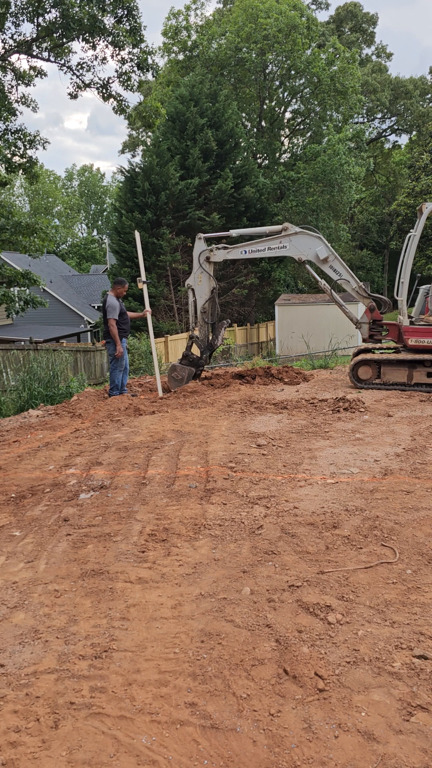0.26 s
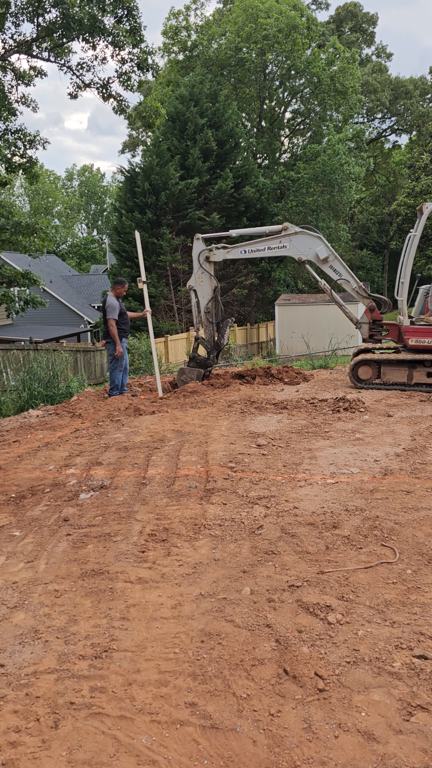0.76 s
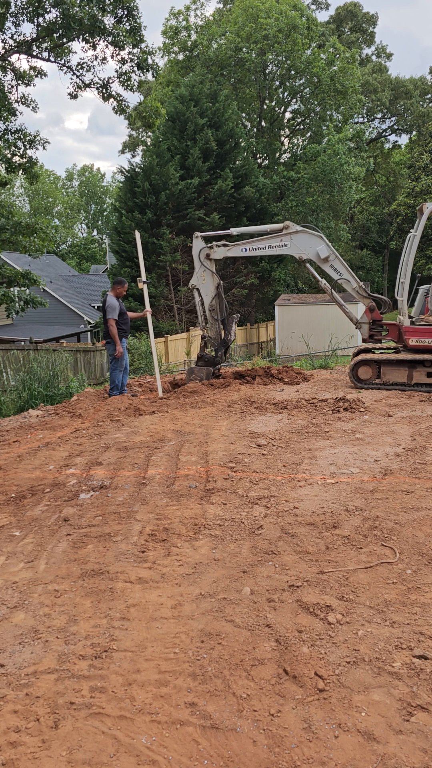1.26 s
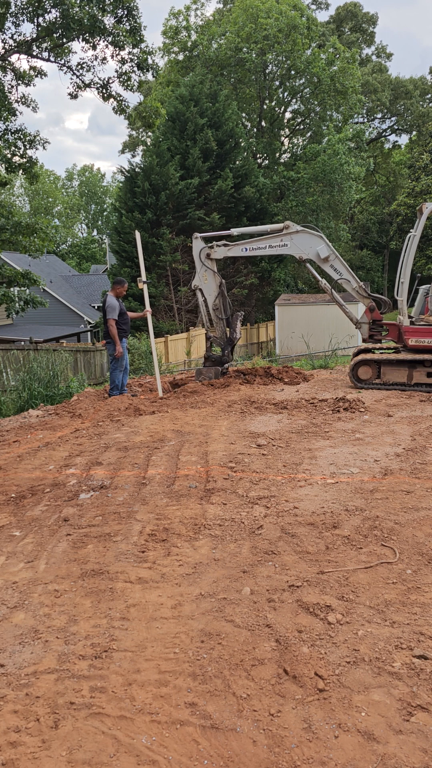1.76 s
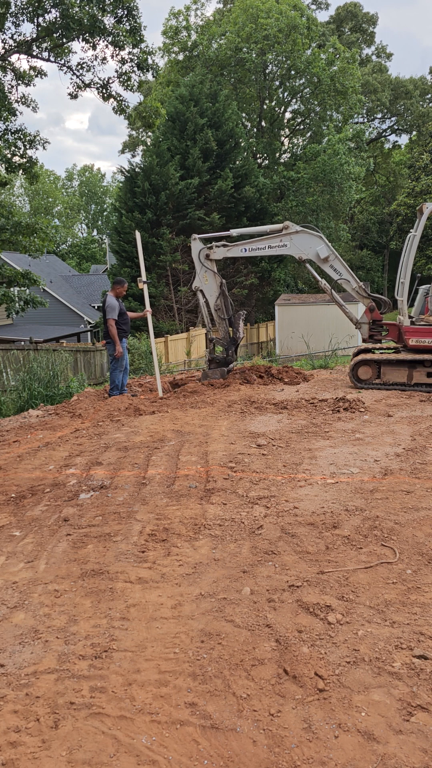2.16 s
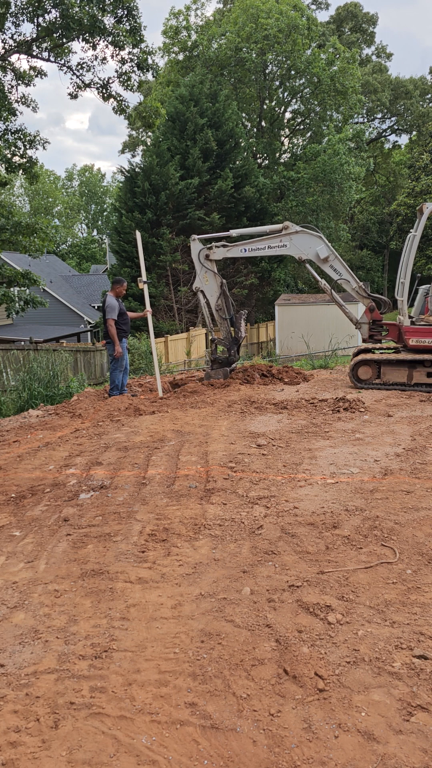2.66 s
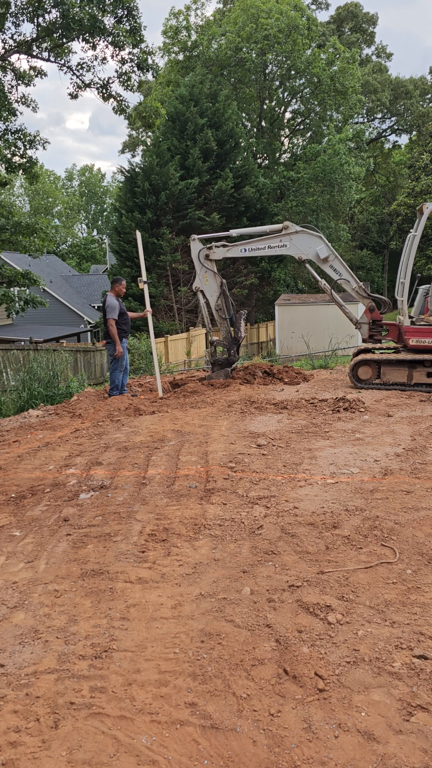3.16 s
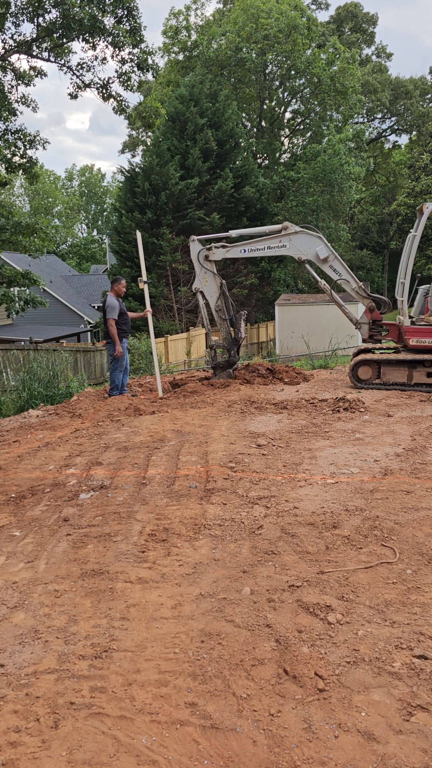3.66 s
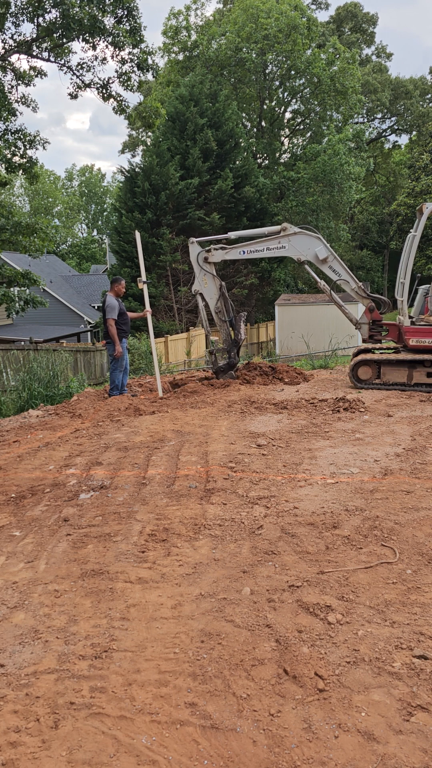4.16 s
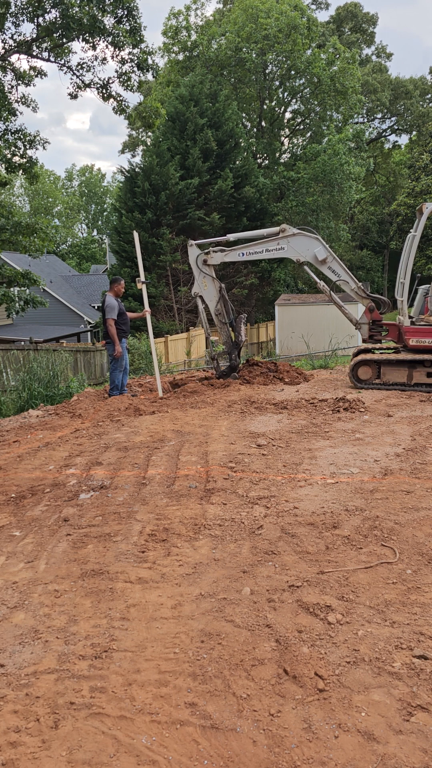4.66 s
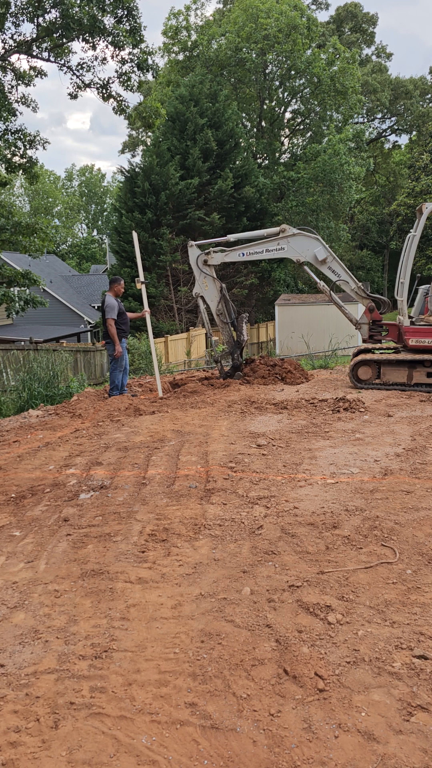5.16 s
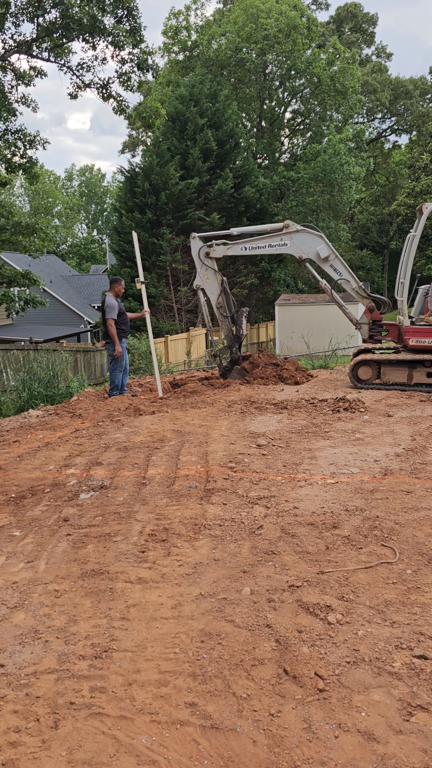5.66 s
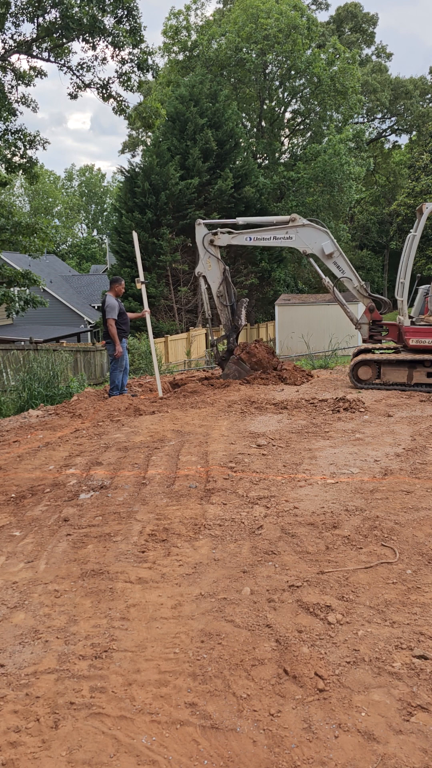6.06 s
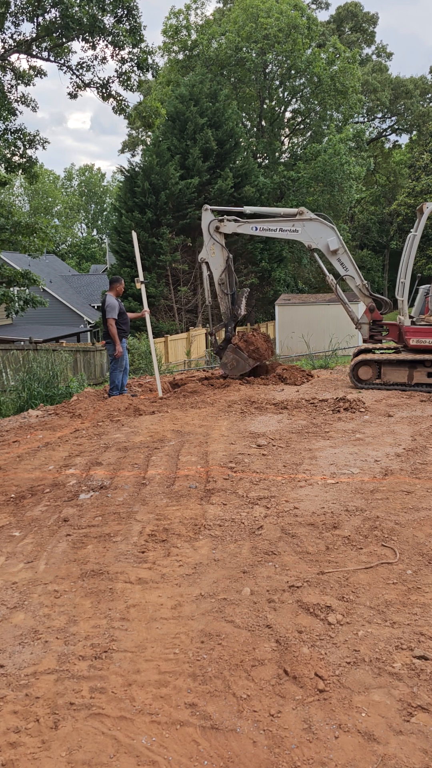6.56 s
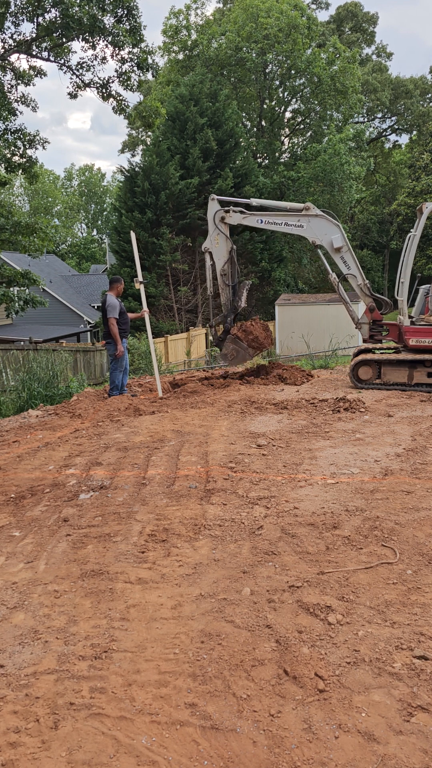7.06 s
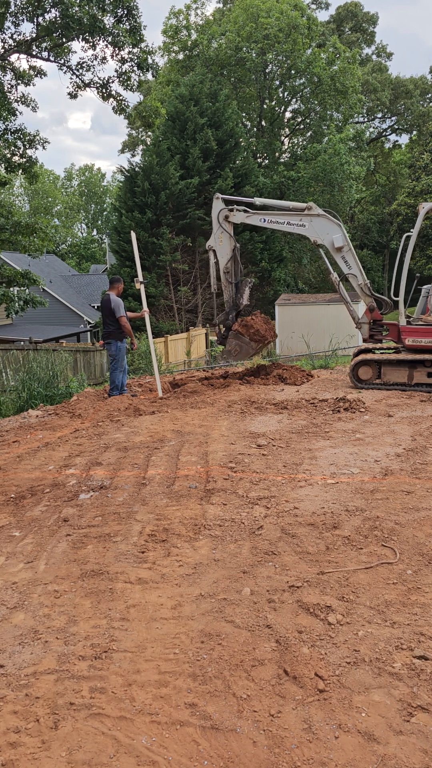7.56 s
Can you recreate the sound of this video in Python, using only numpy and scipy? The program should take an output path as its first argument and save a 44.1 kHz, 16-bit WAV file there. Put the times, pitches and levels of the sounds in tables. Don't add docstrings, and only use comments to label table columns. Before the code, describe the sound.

Outdoor clay yard, stereo microphone close to a big dog. A diesel digger booms steadily across the yard with valve clatter and hydraulic hiss. A faint far dog whine and dull clod thuds come early. The near dog barks hoarsely once a second, with short fence echoes. Near five seconds the engine speeds up slightly and loses its boom; a thin high bird whistle follows.

```python
import sys
import numpy as np
from scipy import signal
from scipy.fft import rfft, irfft, next_fast_len
from scipy.io import wavfile
from scipy.ndimage import uniform_filter1d, map_coordinates

SR = 44100
rng = np.random.default_rng(int(sys.argv[2]) if len(sys.argv) > 2 else 0)


def undo_db(level):
    steps = np.asarray(level, float) / 20
    return 10 ** steps


def to_wav(s):
    ch = np.atleast_2d(s).T
    pcm = np.round(np.clip(ch, -1, 1) * 32767)
    wavfile.write(sys.argv[1], SR, pcm.astype(np.int16))


N = 344862


def unit(x):
    return x / np.sqrt(np.mean(x ** 2) + 1e-20)


def seconds():
    return np.arange(N) / SR


def along(points, hz):
    f, v = np.transpose(points)
    return np.interp(np.log(hz + 1), np.log(f + 1), v)


def curves(rows):
    s, *columns = np.transpose(rows)
    return [np.interp(seconds(), s, column) for column in columns]


def wobble(rate):
    knots = rng.standard_normal(int(N * rate / SR) + 4)
    return map_coordinates(knots, [np.arange(N) * rate / SR])


def sine(hz):
    return np.sqrt(2) * np.sin(2 * np.pi * np.cumsum(hz) / SR)


def filtered(x, response):
    m = next_fast_len(N + SR // 2)
    return irfft(rfft(x, m) * response(np.fft.rfftfreq(m, 1 / SR)), m)[..., :N]


def resonated(x, modes, low_hz, high_hz):
    def ring(f):
        total = 0
        for k, (centre, width, db) in enumerate(modes):
            damping = 1j * f * width
            total = total + (-1) ** k * undo_db(db) * damping / (centre ** 2 - f ** 2 + damping)
        return total

    edges = signal.butter(4, [low_hz, min(high_hz, SR / 2.1)], "bandpass", fs=SR, output="sos")
    return unit(signal.sosfilt(edges, filtered(x, ring)))


def placed(pair, left_db, lead_s):
    half = np.array([[.5], [-.5]])
    return filtered(pair, lambda hz: undo_db(half * along(left_db, hz)) * np.exp(2j * np.pi * hz * lead_s * half))


# f/Hz, left-right likeness [0-1]
PORT_LIKENESS = [(60, 0.84), (300, 1), (700, 0.79), (1500, 0.87), (3000, 0.68), (7000, 0.36), (15000, 0.15)]


def rush(spectrum, white=None):
    white = rng.standard_normal((2, N)) if white is None else white

    def mid_side(hz):
        turn = np.arccos(np.clip(along(PORT_LIKENESS, hz), -1, 1)) / 2
        return undo_db(along(spectrum, hz)) * [np.cos(turn), np.sin(turn)]

    mid, side = filtered(white, mid_side)
    return unit(np.array([mid + side, mid - side]))


def tone(rows, drift_hz, rate):
    hz, db = curves(rows)
    on = (seconds() > rows[0][0]) & (seconds() < rows[-1][0])
    return on * undo_db(db) * sine(hz + drift_hz * wobble(rate))


# multiple of the four-stroke cycle, loaded level/dB, unloaded level/dB
EXHAUST_ORDERS = [(3.06, -36, -39.5), (4.05, -63, -48), (5.14, -47, -54), (7.26, -61, -53), (8, -69, -57),
                  (9.04, -32.5, -32.5), (10, -38.5, -62), (11.03, -49, -43), (12.015, -29.5, -35.5),
                  (12.66, -51, -47), (14.02, -79, -46), (15.31, -47, -55), (18.05, -67, -54.5),
                  (19.99, -46.5, -55), (21.04, -52.5, -82), (29.24, -61, -54.5), (32.5, -63, -95),
                  (34.6, -57, -70), (40.4, -58.5, -78), (39.8, -77, -60.5), (43.3, -59.5, -88),
                  (45.8, -68, -79), (42.6, -77, -79), (45, -69, -68), (50.5, -58.5, -73), (56, -80, -69),
                  (55.2, -66, -86), (57.9, -60, -82), (61.1, -59, -67)]


def exhaust(cycle, boom_db, load):
    out = undo_db(boom_db) * np.cos(2 * np.pi * 6 * cycle - 2.2)
    lag = 1.1 * (1 - load)
    for k, heavy_db, light_db in EXHAUST_ORDERS:
        level_db = light_db + load * (heavy_db - light_db) + 0.58 * wobble(10)
        scatter = .7 * k * k * (k % 3)
        out = out + undo_db(level_db) * np.cos(2 * np.pi * k * cycle - 2.2 + lag * (k > 6) + scatter)
    return np.sqrt(2) * out


# crank share [0-1], ring f/Hz, width f/Hz, loaded level/dB, unloaded level/dB
STRIKING_PARTS = [(.96, 1380, 160, -51.5, -56), (.34, 1400, 170, -53, -62), (.65, 1250, 140, -60, -60),
                  (.97, 2870, 260, -58, -59.5), (.05, 2620, 200, -60, -61), (.36, 2850, 260, -58.5, -64),
                  (.28, 2100, 150, -62, -55.5), (.34, 2150, 150, -56, -56.5), (.46, 1880, 140, -57, -57),
                  (.52, 2100, 140, -59, -56), (.63, 1930, 180, -56, -57), (.79, 2060, 140, -58, -59),
                  (.88, 1950, 140, -59, -59), (.0, 2050, 140, -59, -57), (.14, 1750, 120, -58, -62),
                  (.99, 1750, 120, -58, -64), (.04, 740, 70, -60, -56), (.7, 770, 70, -57, -62)]


def strikes(cycle, load):
    out = np.zeros(N)
    for share, hz, width_hz, heavy_db, light_db in STRIKING_PARTS:
        at = np.flatnonzero(np.diff(np.floor(cycle - share)))
        blows = np.zeros(N)
        blows[at] = undo_db(1.8 * rng.standard_normal(N)[at])
        rattle = signal.lfilter([1], [1, -np.exp(-1 / (.003 * SR))], blows) * rng.standard_normal(N)
        struck = unit(blows) + .4 * unit(rattle) + .35 * rng.standard_normal(N)
        mode = signal.tf2sos(*signal.iirpeak(hz, hz / width_hz / 1.3, SR))
        ring = signal.sosfilt(np.vstack([mode, mode]), struck)
        out += undo_db(light_db - 5 + load * (heavy_db - light_db)) * unit(ring)
    return out


# one row loaded, one unloaded; a column for each cylinder, level/dB
CYLINDER_KNOCK = [(0, 2, 2.1), (0, -2, 3.7)]


def knocks(cycle, load):
    firing = (3 * cycle).astype(int)
    heavy_db, light_db = np.array(CYLINDER_KNOCK)[:, firing % 3]
    chance_db = 1.2 * rng.standard_normal(firing[-1] + 1)[firing]
    since = 3 * cycle - firing
    size = undo_db(light_db + load * (heavy_db - light_db) + chance_db)
    return size * (1 - np.exp(-since / 0.064)) * np.exp(-since / 0.18)


# from t/s, hiss level/dB
PUMP_PRESSURE = [
    (0, -54),
    (.55, -58),
    (3.0, -55),
    (5.07, -59.5),
    (6.5, -58.5),
    (7.1, -60),
]


def pressure():
    s, db = np.transpose(PUMP_PRESSURE)
    step = np.searchsorted(s, seconds(), "right").clip(1) - 1
    return uniform_filter1d(db[step], size=2500)


# f/Hz, level/dB per Hz
RUMBLE_SPECTRUM = [(15, -60.5), (25, -13), (61, -16.5), (91, -11), (130, -8), (184, -3.5), (226, -10.5),
                   (344, -27.5), (700, -52), (910, -72), (1540, -120)]
CLATTER_LOADED = [(210, -52), (350, -5), (384, -6.5), (532, -2.5), (576, -5.5), (674, -9.5), (875, -10.5),
                  (947, -12.5), (1330, -6.5), (1600, -13), (1750, -11), (2310, -18), (2770, -12),
                  (3280, -17), (8000, -18), (10400, -28), (17600, -120)]
CLATTER_UNLOADED = [(210, -49), (350, -5.5), (420, -14.5), (461, -2), (656, -20), (710, -10), (831, -12),
                    (998, -22), (1180, -11.5), (1620, -16), (2100, -39), (2370, -21), (2840, -18.5),
                    (4050, -24.5), (8000, -25.5), (10400, -58), (17600, -120)]
PUMP_HISS = [(2940, -0.5), (5000, -9), (5660, -15), (6930, -23.5), (7520, -1), (8350, -7), (9200, 3.5),
             (9740, -0.5), (10400, -7.5), (13400, -6.5), (15700, -16)]
PUMP_GEARS = [(1500, -120), (1700, -2), (1850, -7.5), (2070, -2.5), (2230, -8), (2400, -120)]


def casing(cycle, load):
    knock = knocks(cycle, load)
    repeating = rng.standard_normal((2, 3000))[:, (cycle % 1 * 3000).astype(int)]
    parts = .85 * repeating + .5 * rng.standard_normal((2, N))
    clatter = np.sqrt(load) * rush(CLATTER_LOADED, parts) + np.sqrt(1 - load) * rush(CLATTER_UNLOADED, parts)
    rumble_db = -37.5 + 0.92 * load + 0.6 * wobble(8.4)
    clatter_db = -45.5 + 1.9 * load + 0.59 * wobble(4.75)
    gears_db = -53.5 - 5 * load + .6 * wobble(4)
    out = undo_db(rumble_db) * unit((1.1 + knock) * rush(RUMBLE_SPECTRUM))
    out += undo_db(clatter_db) * unit((1.35 + knock) * unit(clatter))
    out += undo_db(pressure() + 7.5) * unit((0.75 + knock) * rush(PUMP_HISS))
    return out + undo_db(gears_db) * rush(PUMP_GEARS, parts)


# start t/s, end t/s, level/dB; one that ends before it starts stays shut
VALVE_OPENINGS = [
    (0, 7.9, -69),
    (3.0, 5.05, -75),
    (5.36, 5.78, -65),
    (5.99, 8.1, -69),
    (7.16, 5.8, -62),
    (7.28, 6.4, -62),
    (7.38, 7.3, -65),
]
# f/Hz, level/dB per Hz
VALVE_HISS = [(10800, -120), (11200, -8), (12000, -6), (12800, -14), (14000, -8), (15700, -7.5)]


def valves():
    t = seconds()
    held = sum(undo_db(db) * (t > start) * (t < end) for start, end, db in VALVE_OPENINGS)
    return uniform_filter1d(held, size=1200) * undo_db(6.0 + 0.89 * wobble(30)) * rush(VALVE_HISS)


# t/s, four-stroke cycles per second f/Hz, boom level/dB
ENGINE_RUN = [(0, 14.35, -18.2), (.4, 14.2, -17.9), (.8, 14.38, -18.5), (1.8, 14.264, -18.5),
              (2.8, 14.419, -18.8), (3.1, 14.186, -18.4), (4.55, 14.233, -18.7), (4.75, 14.515, -18.5),
              (4.9, 15.148, -24.8), (5.05, 15.318, -31), (5.45, 15.217, -29.5), (5.95, 15.179, -28.2),
              (6.45, 15.222, -28.8), (6.75, 15.139, -27.1), (7.3, 15.328, -30.4), (7.58, 15.021, -25.8),
              (7.7, 15.12, -27), (7.82, 15.2, -36)]
# f/Hz, left over right level/dB
DIGGER_SIDE = [(60, 1.2), (200, 1.3), (700, 2), (2400, 2), (4400, 2.5), (8100, 4.5), (15000, 5.5)]


def engine():
    cycle_hz, boom_db = curves(ENGINE_RUN)
    cycle = .029 + np.cumsum(cycle_hz + .01 * wobble(9)) / SR
    load = np.clip((boom_db + 28) / 9, 0, 1)
    digger = exhaust(cycle, boom_db, load) + strikes(cycle, load) + casing(cycle, load) + valves()
    return placed(digger, DIGGER_SIDE, lead_s=.00005)


# t/s, pitch f/Hz, level/dB
FAR_WHINE = [
    (0.19, 402, -71),
    (0.236, 411, -41.5),
    (0.258, 404, -54),
    (0.292, 404, -33),
    (0.38, 397, -51),
    (0.4, 376, -51),
]


def far_dog():
    return tone(FAR_WHINE, drift_hz=4, rate=30)


# t/s, level/dB, t60/s
CLAY_DROPS = [
    (.21, -40, 0.065),
    (1.265, -37, 0.2),
    (1.33, -42, .08),
]
# f/Hz, width f/Hz, level/dB
CLAY_MODES = [(330, 120, -2), (450, 170, -2), (624, 200, -5)]


def clods():
    t = seconds()
    fall = sum(undo_db(db - 60 * np.abs(t - s) / t60) * (t > s) for s, db, t60 in CLAY_DROPS)
    return uniform_filter1d(fall, size=400) * resonated(rng.standard_normal(N), CLAY_MODES, 300, 920)


def vocal_folds():
    beats = np.cumsum(255 * undo_db(1.3 * wobble(60))) / SR
    slap = np.flatnonzero(np.diff(beats.astype(int)))
    folds = np.zeros(N)
    folds[slap] = undo_db(2.5 * rng.standard_normal(N)[slap])
    puff = signal.lfilter([1], [1, -np.exp(-1 / (0.0028 * SR))], folds)
    return unit(folds) + unit(puff * rng.standard_normal(N))


def steadied(x, span_s, share):
    swing = np.sqrt(np.abs(uniform_filter1d(x ** 2, size=int(span_s * SR))) + 1e-9)
    return unit(x / swing ** share)


# onset t/s, held t/s, strength level/dB, surge after onset t/s, surge level/dB
DOG_BARKS = [
    (0.434, 0.11, -17.5, 0.063, 6),
    (1.517, 0.11, -19, 0.041, 6),
    (2.46, 0.11, -18, .024, 5),
    (3.467, 0.12, -19.5, 0.032, 6.5),
    (4.349, 0.075, -22, 0.041, 8.5),
    (5.484, 0.12, -18.5, 0.0526, 10),
    (6.496, .11, -18, 0.039, 5),
    (7.565, 0.12, -17.5, 0.055, 3.5),
]
# f/Hz, width f/Hz, level/dB
THROAT_OPEN = [(517, 39.4, 4.5), (419, 66, -3), (624, 46, -6)]
THROAT_SHUT = [(388.4, 49.6, 1), (461.5, 25, -1.8)]
MOUTH_OPEN = [(764.6, 160, 1.5), (986, 215, 2.5), (1265, 82, 5.5), (1476, 230, 3.5)]
MOUTH_SHUT = [(643, 51, 8), (767, 30, 10), (910, 560, -2.5), (1173, 124, -1.5)]
BREATH_MODES = [(1906, 230, 0.5), (2304, 113, 5.5), (3170, 1030, -11.5), (4430, 650, -7), (5460, 390, -12),
                (6280, 610, -13.5), (7520, 370, -11), (9100, 2600, -24), (11100, 870, -17),
                (15200, 1900, -19)]
CHEST_MODES = [(244, 120, 0)]


def dog():
    onset, *row = np.transpose(DOG_BARKS)
    which = np.searchsorted(onset[1:] - .2, seconds())
    held, strength_db, surge_at, surge_db = np.array(row)[:, which]
    since = seconds() - onset[which]
    after = np.maximum(since - held, 0)
    rising = np.maximum(0.0095 - since, 0)

    shut_db = 1500 * np.maximum(-.012 - since, 0)
    effort_db = np.maximum(strength_db - 552 * rising - 256 * after - shut_db, -90)
    surge = np.exp(-((since - surge_at) / 0.034) ** 2)

    opening_db = -398 * rising
    upper_db = -0.37 + opening_db - 145 * after
    breath_db = -13 + opening_db + 2.2 * wobble(45) - 44 * np.abs(since) - 155 * after

    jaw_open_share, jaw_shut_s = .27, 0.012
    opening = np.clip((held + jaw_shut_s - since) / (held * (1 - jaw_open_share) + jaw_shut_s), 0, 1)
    larynx_rest = 0.78
    larynx = np.clip(larynx_rest + (1 - larynx_rest) * surge, 0, 1) * (0.26 + .8 * opening)

    source = vocal_folds()
    low = np.sqrt(larynx) * resonated(source, THROAT_OPEN, 373, 1025)
    low = low + np.sqrt(np.abs(1 - larynx)) * resonated(source, THROAT_SHUT, 352, 950)
    upper = opening * resonated(source, MOUTH_OPEN, 716, 1550)
    upper = upper + np.sqrt(1 - opening ** 2) * resonated(source, MOUTH_SHUT, 678, 1400)
    low = steadied(low, span_s=.03, share=.8)
    upper = steadied(upper, span_s=.015, share=.7)

    note_hz = 508 - 25 * np.maximum(-20.5 - strength_db, 0) + 14 * wobble(40)
    low = low * np.sqrt(1 - 0.53 * surge) + undo_db(-5.5) * np.sqrt(surge) * sine(note_hz)
    air = source + 1.3 * rng.standard_normal(N) + 1.22 * rng.standard_normal((2, N))
    voice = undo_db(surge_db * surge) * low + undo_db(upper_db) * upper
    voice = voice + undo_db(-22) * resonated(source, CHEST_MODES, 180, 343)
    return undo_db(effort_db) * (voice + undo_db(breath_db) * resonated(air, BREATH_MODES, 1320, 13700))


# f/Hz, t60/s
FENCE_DECAY = [(300, 0.27), (1000, 0.25), (3000, 0.25), (10000, 0.32)]


def fences(x):
    hz, t, z = signal.stft(rng.standard_normal((2, SR // 2)), SR, nperseg=256)
    decay = undo_db(-60 * t / along(FENCE_DECAY, hz)[:, None])
    tail = signal.istft(z * decay, SR, nperseg=256)[1]
    late = np.pad(x, (700, 0))[None]
    return signal.fftconvolve(late, tail / np.linalg.norm(tail[0]), axes=1)[:, :N]


# f/Hz, left over right level/dB
DOG_SIDE = [(300, 1.5), (700, 4), (1300, 4.5), (2400, 1.5), (4400, 0), (15000, 2)]


def dog_in_yard():
    bark = dog()
    yard = fences(bark[0])
    wall = undo_db(-38) * np.pad(yard, ((0, 0), (round(.2 * SR), 0)))[:, :N]
    return placed(bark, DOG_SIDE, lead_s=-0.00012) + undo_db(-14.0) * yard + wall


# t/s, f/Hz, level/dB
BIRD_WHISTLE = [
    (5.35, 9000, -85),
    (5.37, 8700, -67),
    (5.41, 8000, -62),
    (5.46, 7700, -64),
    (5.6, 7550, -65),
    (5.76, 7500, -68),
    (5.8, 7500, -85),
]


def bird():
    return undo_db([[2.5], [-2.5]]) * tone(BIRD_WHISTLE, drift_hz=80, rate=250)


def scene():
    return engine() + far_dog() + clods() + dog_in_yard() + bird()


def roll_off(x):
    return signal.sosfilt(signal.butter(12, 15890, fs=SR, output="sos"), x)


def record(dry):
    soft = dry / (1 + np.abs(dry / 1.02) ** 8) ** (1 / 8)
    mix = filtered(soft, lambda hz: (hz < 15750) / np.sqrt(1 + (36 / (hz + 1)) ** 8))
    return roll_off(mix)


dry = scene()
out = record(dry)
to_wav(out)
```